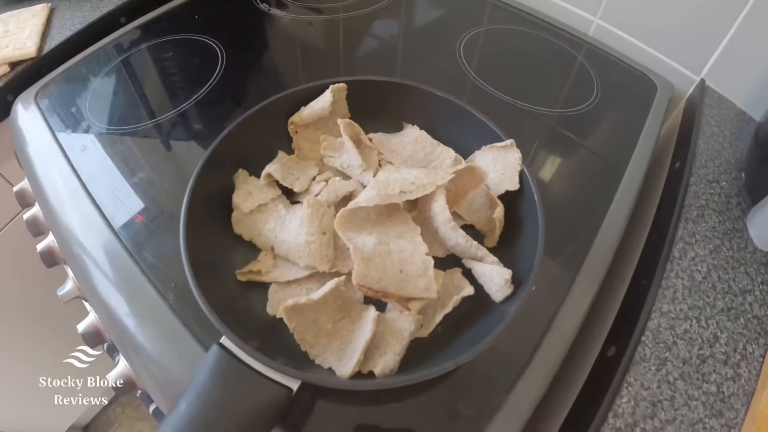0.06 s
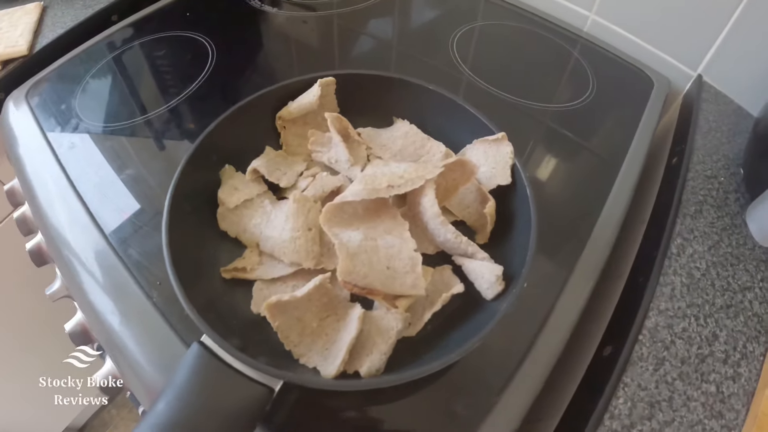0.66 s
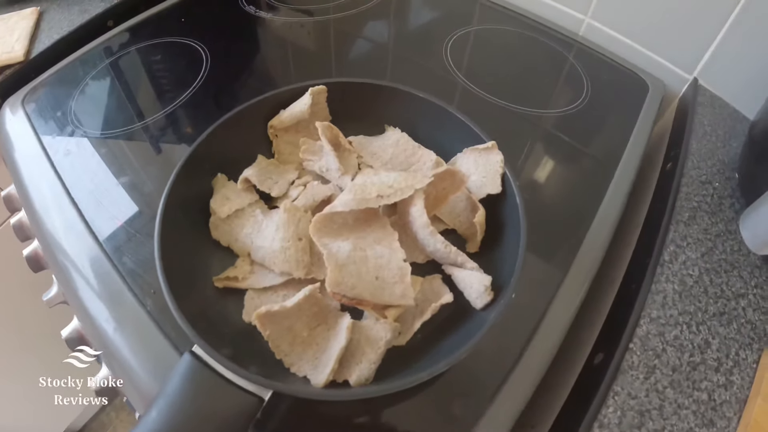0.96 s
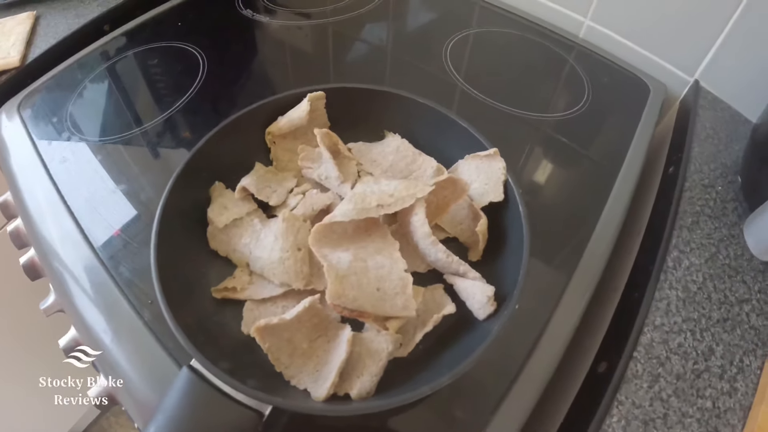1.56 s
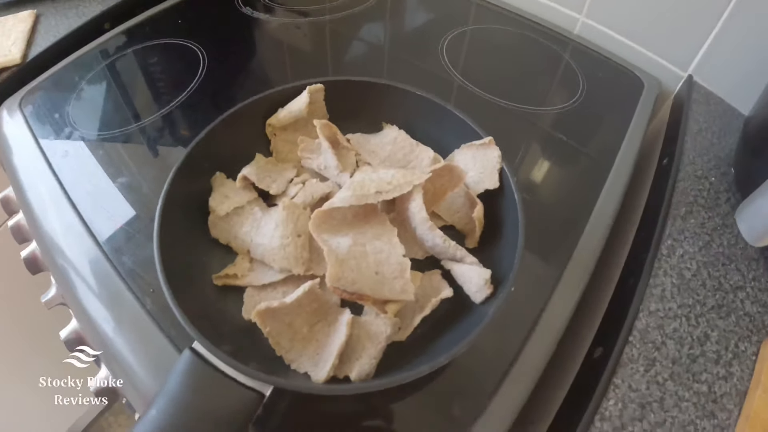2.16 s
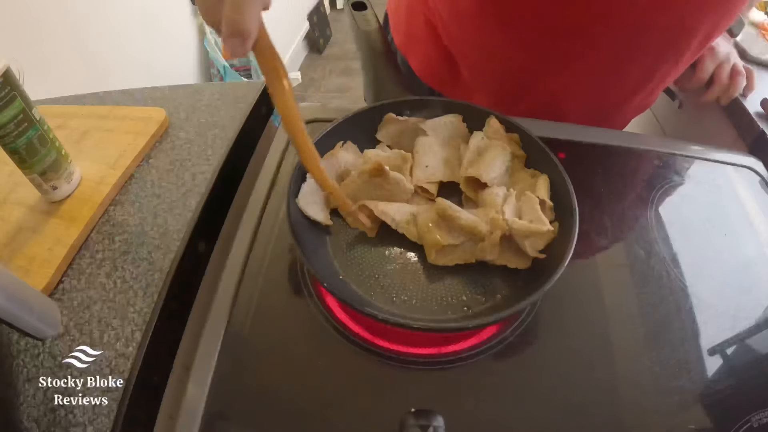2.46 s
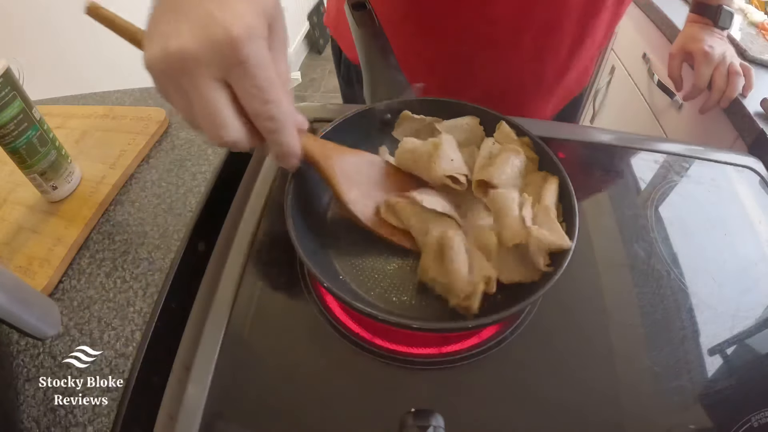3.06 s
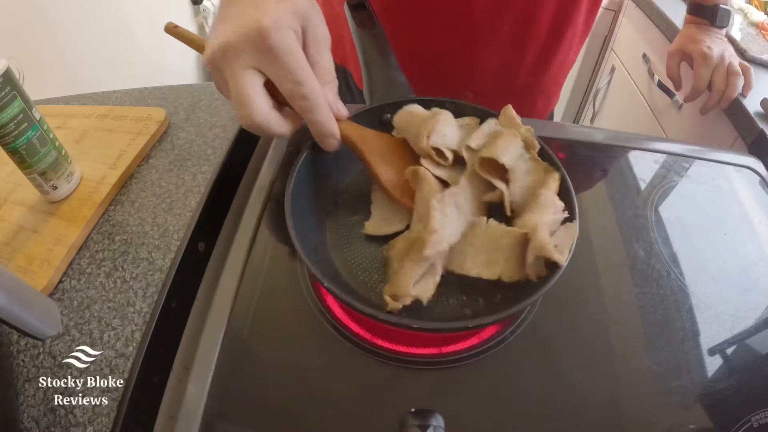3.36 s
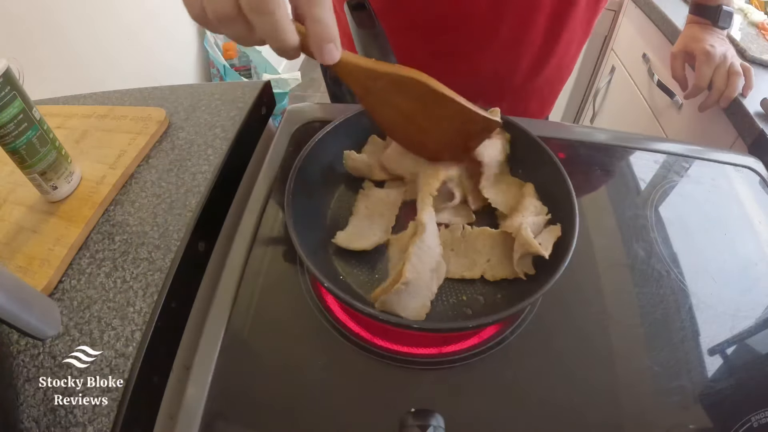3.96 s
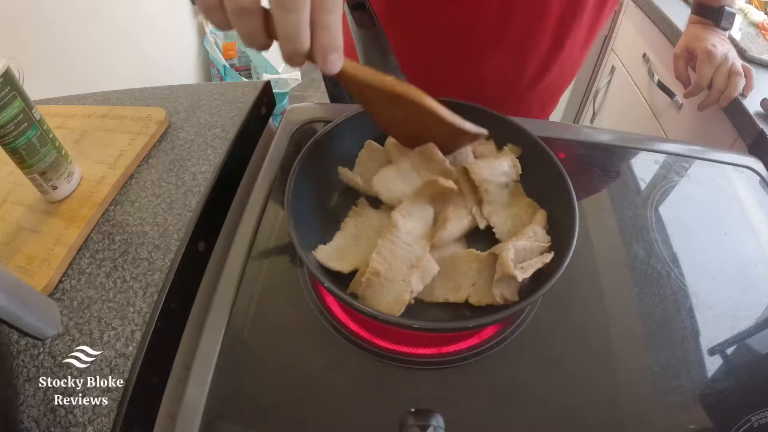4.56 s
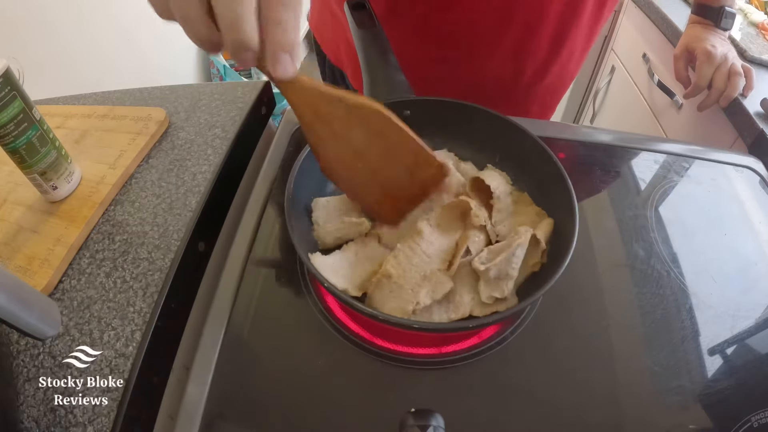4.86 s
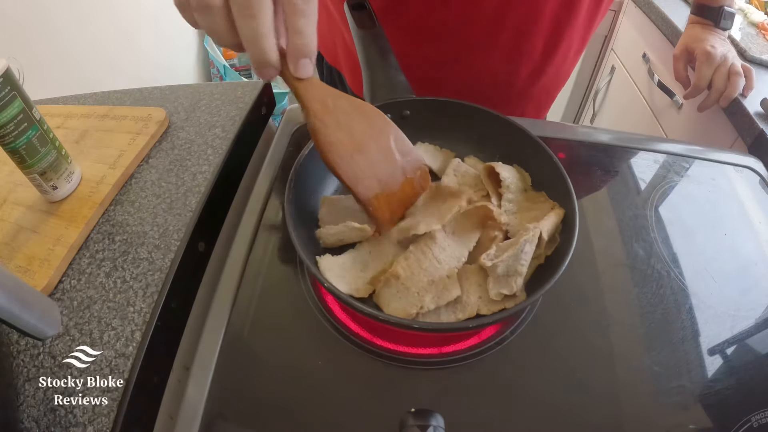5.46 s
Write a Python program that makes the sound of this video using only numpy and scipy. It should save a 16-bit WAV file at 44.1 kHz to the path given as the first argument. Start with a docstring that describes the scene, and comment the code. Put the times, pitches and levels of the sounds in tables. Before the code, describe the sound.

In a small kitchen with a low hum, meat fries with a steady, crackling hiss. At first the microphone hovers over the pan, with dull bumps and clicks from handling. The sound cuts out briefly and resumes, narrower and straight ahead: the pan knocks lightly on a glass hob, faint puffs of steam escape, and the sizzling dips and surges with the stirring, dotted with sharp pops of fat.

```python
"""A close, bright sizzle: steam bubbles burst under slices of meat in a pan on a glass hob.
The camera's stereo microphone is hand-held just over the pan, in a small kitchen with a low drone;
fat spits, and the camera body thumps, sways and clicks under the fingers.
After a short silence the microphone stands across the hob: a wooden spatula turns the meat,
the frying flares, the pan knocks on the glass and steam hisses from under the pressed slices."""
import sys
import numpy as np
from scipy import signal
from scipy.fft import rfft, irfft, next_fast_len
from scipy.io import wavfile
from scipy.ndimage import map_coordinates

SR = 44100
rng = np.random.default_rng(int(sys.argv[2]) if len(sys.argv) > 2 else 0)


def bounce(signal):
    """Save signal as a 16-bit WAV file at the path given by the first command-line argument."""
    frames = np.transpose(np.atleast_2d(signal))
    limited = np.clip(frames, -1, 1)
    pcm = np.round(limited * 32767).astype(np.int16)
    wavfile.write(sys.argv[1], SR, pcm)


N = 251370


def amp(db):
    """Decibels to gain."""
    return 10 ** (np.asarray(db) / 20)


def unit(x):
    """Scale to rms 1."""
    return x / np.sqrt(np.mean(x ** 2) + 1e-20)


def along(points, hz):
    """Interpolate (f/Hz, value) points on a log-frequency axis."""
    freqs, values = np.transpose(points)
    return np.interp(np.log(hz + 1), np.log(freqs + 1), values)


def clock():
    """The time of every sample."""
    return np.arange(N) / SR


def curve(points):
    """Interpolate (t/s, value) points at every sample."""
    return np.interp(clock(), *np.transpose(points))


def hump(s, length):
    """A smooth swell of height 1 centred on time s."""
    return np.exp(-((clock() - s) / length) ** 2)


def wobble(rate):
    """A smooth random curve, rate knots a second."""
    return map_coordinates(rng.standard_normal(int(N * rate / SR) + 4), [clock() * rate])


def filtered(x, response):
    """Shape x by a response, a function of frequency."""
    n = x.shape[-1]
    padded = next_fast_len(n + 8192)
    return irfft(rfft(x, padded) * response(np.fft.rfftfreq(padded, 1 / SR)), padded)[..., :n]


def bell(hz, centre_hz, octaves):
    """A hump of height 1 on a log-frequency axis."""
    return np.exp(-.5 * (np.log2((hz + 1) / centre_hz) / octaves) ** 2)


def add(track, s, sound):
    """Mix a sound into a track at time s."""
    part = track[..., round(s * SR):][..., :sound.shape[-1]]
    part += sound[..., :part.shape[-1]]


def stereo(pair, colour, width):
    """Colour two unrelated signals as mid (rms 1) and side; width lists f/Hz, side minus mid/dB."""
    mid, side = filtered(pair, lambda hz: colour(hz) * amp([np.zeros_like(hz), along(width, hz)]))
    return np.array([mid + side, mid - side]) / np.std(mid)


def leaning(x, balance):
    """Tilt a sound to one side; balance lists f/Hz, left minus right/dB."""
    return filtered(x, lambda hz: amp(along(balance, hz) * np.array([[.5], [-.5]])))


def bursts(rate, spread_db, life_s, hiss_db, biggest=3.1):
    """Tiny steam bubbles burst at random, each a short puff; the countless smallest merge into hiss."""
    sizes = amp(spread_db * np.minimum(rng.standard_exponential(N), biggest))
    onsets = (rng.random(N) < rate / SR) * sizes ** 2
    power = signal.lfilter([1], [1, -np.exp(-2 / (life_s * SR))], onsets)
    return unit(np.sqrt(power / power.mean() + amp(hiss_db) ** 2) * rng.standard_normal((2, N)))


# Broad resonances of the open pan: f/Hz, width/octaves, gain/dB
PAN_RESONANCES = [(687, 0.27, -2), (1100, 0.13, 1), (1343, 0.11, 2), (1612, 0.13, 7.5), (1970, 0.1, 1),
                  (2930, .08, 2.5), (3680, 0.11, 3)]

def bowl(hz):
    """The open pan colours all that pops inside it."""
    return amp(sum(db * bell(hz, centre_hz, octaves) for centre_hz, octaves, db in PAN_RESONANCES))


# Juice boiling under the meat: f/Hz, relative level/dB
JUICE_SPECTRUM = [(250, -33), (500, -16), (760, -7), (1050, 3.5), (1600, -4), (2100, -0.5), (3000, -14)]

def frying(levels, spectrum, width, pops, spray_trim_db, usual_db=-48, split_hz=8300, flutter_db=0.88):
    """Bubbles burst as sizzle and fine spray, juice boils lower down; one strength drives all three."""
    strength_db, flare_db = curve(levels) - usual_db, flares()
    sizzle_db = usual_db + strength_db + flare_db
    spray_db = -60 + spray_trim_db + 0.37 * strength_db + 0.88 * flare_db
    juice_db = -59 + 1.63 * strength_db + 1.8 * flare_db + 1.2 * wobble(8)
    low_share = lambda hz: 1 / (1 + (hz / split_hz) ** 20)
    colour = lambda hz: bowl(hz) * amp(along(spectrum, hz)) * hz ** 3 / (hz ** 3 + 1100 ** 3)
    sizzle = stereo(pops, lambda hz: colour(hz) * low_share(hz), width)
    spray = stereo(pops, lambda hz: colour(hz) * (1 - low_share(hz)), width)
    boiling = bursts(rate=380, spread_db=2.0, life_s=.0012, hiss_db=-1)
    juice = stereo(boiling, lambda hz: bowl(hz) * amp(along(JUICE_SPECTRUM, hz)), width)
    fry = amp(sizzle_db) * sizzle + amp(spray_db) * spray + amp(juice_db) * juice
    return fry * amp(flutter_db * wobble(35))


def small_bubble(hz, low_hz, high_hz):
    """Small bubbles radiate no bass, and the fat damps their highest treble."""
    return hz ** 3 / (hz ** 3 + low_hz ** 3) / np.sqrt(1 + (hz / high_hz) ** 6)


def crackles(levels, rate, pitch_hz, db, spread_db=5.5, cycles=3.0):
    """Larger bubbles snap one by one, each at its own pitch, louder when the sizzle is strong."""
    when, pitch_draw, size_draw = rng.random((round(rate * N / SR), 3)).T
    starts = (when * (N - 1)).astype(int)
    snap_hz = pitch_hz * 2 ** (1.3 * pitch_draw[:, None] ** 1.5 - .4)
    size = amp(curve(levels)[starts] + db - spread_db * np.log(1 - .93 * size_draw))
    step = np.arange(SR // 200)
    turns = snap_hz * step / SR
    snaps = size[:, None] * np.sin(2 * np.pi * turns) * np.exp(-turns / cycles)
    track = np.bincount((starts[:, None] + step).ravel(), snaps.ravel(), N)[:N]
    return filtered(track, lambda hz: small_bubble(hz, 1500, 8000))


def drone(spectrum, width):
    """Room tone: the steady low noise of the kitchen."""
    return stereo(rng.standard_normal((2, N)), lambda hz: amp(along(spectrum, hz)), width)


# Soft bumps on the camera body, right at the microphone: t/s, level/dB, t60/s
BODY_BUMPS = [(0.295, -29.5, 0.21), (0.706, -19, 0.21), (1.064, -23.5, 0.2), (1.15, -21, 0.24),
              (1.356, -36, 0.47), (1.398, -27.5, 0.44)]

def bumps(ring_hz=92, push_hz=42, push_db=-3, push_t60=0.11, attack_s=0.0091):
    """A soft bump shoves the camera, which shudders on its mount."""
    track, t = np.zeros(N), np.arange(SR // 2) / SR
    for s, db, t60 in BODY_BUMPS:
        shudder = -np.sin(2 * np.pi * ring_hz * t) * amp(-60 * t / t60)
        shove = np.sin(2 * np.pi * push_hz * t) * amp(push_db - 60 * t / push_t60)
        add(track, s, amp(db) * (shudder + shove) * (1 - np.exp(-(t / attack_s) ** 2)))
    return track


# The loudest spits of fat, at both microphone positions: t/s, relative level/dB, f/Hz
FAT_SPITS = [(0.9608, -29, 7000), (1.7290, -26, 5340), (2.1531, -22.5, 7000), (2.307, -24.5, 5400),
             (2.5378, -27, 4300), (2.5576, -26, 5350), (2.6073, -23.5, 5040), (2.7447, -31, 2970),
             (3.1416, -32, 3680), (3.1649, -23.5, 4780), (3.8915, -32, 4630), (3.979, -27, 3970),
             (4.0697, -11, 3210), (4.0802, -23.5, 3600), (4.3103, -20.5, 2640), (4.347, -27.5, 3620),
             (4.4988, -22, 3430), (4.505, -21.5, 3400), (4.6595, -29, 3300), (4.8373, -24, 3380),
             (5.325, -27, 3330)]

def spits(ring_cycles=1.58, crack_s=0.0021, splash_s=0.011, tick_hz=950, tick_s=0.0014, room_db=-7):
    """A drop of water explodes in the fat: a crack, a short ring and a dull tick of the pan."""
    track, t = np.zeros(N), np.arange(SR // 16) / SR
    loudest_db = max(db for _, db, _ in FAT_SPITS)
    puff_decay = amp(-11) * np.exp(-t / crack_s) + amp(-23) * np.exp(-t / splash_s)
    tick = np.sin(2 * np.pi * tick_hz * t) * np.exp(-t / tick_s)
    for s, db, pitch_hz in FAT_SPITS:
        ring = np.sin(2 * np.pi * pitch_hz * t) * np.exp(-pitch_hz * t / ring_cycles)
        puff = rng.standard_normal(len(t)) * puff_decay
        band = lambda hz: 1 / np.sqrt(1 + (hz / pitch_hz - pitch_hz / (hz + 1)) ** 2)
        # small, high spits barely move the pan
        tick_gain = amp(-11 + .35 * (db - loudest_db)) * min(3000 / pitch_hz, 1) ** 3
        add(track, s, amp(db) * (filtered(1.21 * ring + 1.26 * puff, band) + tick_gain * tick))
    track = filtered(track, lambda hz: bowl(hz) * small_bubble(hz, 560, 14000))
    return track + amp(room_db) * kitchen(track)


# Reverberation of the small kitchen around the hob: f/Hz, t60/s
KITCHEN_DECAY = [(150, 0.51), (1000, 0.48), (4000, 0.12), (12000, 0.22)]

def kitchen(x):
    """Diffuse answer of the room: each frequency dies at its own speed."""
    hz, t, noise = signal.stft(rng.standard_normal(SR // 2), SR, nperseg=256)
    decay = amp(-60 * t / along(KITCHEN_DECAY, hz)[:, None])
    _, tail = signal.istft(noise * decay, SR, nperseg=256)
    tail = np.pad(tail, (SR // 300, 0))
    return signal.fftconvolve(x, tail / np.linalg.norm(tail))[:N]


# Fingers on the case: t/s, relative click level/dB, relative thud level/dB, thud f/Hz, click cutoff/Hz
FINGER_TAPS = [(1.9003, -21.5, -31.5, 90, 2060), (2.0008, -12, -27.5, 70, 4360),
               (2.2506, -13.5, -23, 75, 11100), (2.2861, -51, -14.5, 50, 1025)]
# Modes of the plastic case around the microphone: f/Hz, level/dB, t60/s
CASE_MODES = [(189, -1, 0.026), (498, -9, 0.01), (950, 0, 0.0059), (1340, -1.5, 0.017), (1700, -4, 0.0093),
              (2580, -0.5, .014), (3210, -3, 0.011), (5400, -20.5, .008), (7780, -10, 0.013),
              (12000, -6.5, 0.0071)]

def fingers(thud_t60=0.064, thud_attack_s=0.0012, click_attack_s=0.00025):
    """Fingers click and thud on the plastic case; the two ports hear each mode at different phases."""
    track, t = np.zeros((2, N)), np.arange(SR // 5) / SR
    port_phase = lambda hz: 0.48 * min(hz / 2000, 1) * np.array([[1], [-1]])
    ring = sum((-1) ** k * amp(level - 60 * t / t60) * np.sin(2 * np.pi * hz * t + port_phase(hz))
               for k, (hz, level, t60) in enumerate(CASE_MODES))
    for s, click_db, thud_db, thud_hz, dull_hz in FINGER_TAPS:
        grit = amp(-5 - 60 * t / .009) * rng.standard_normal((2, len(t)))
        click = (ring + grit) * (1 - np.exp(-t / click_attack_s))
        click = filtered(click, lambda hz: 1 / np.sqrt(1 + (hz / dull_hz) ** 4))
        thud = -np.sin(2 * np.pi * thud_hz * t + 1) * amp(-60 * t / thud_t60)
        thud *= 1 - np.exp(-(t / thud_attack_s) ** 2)
        add(track, s, amp(click_db - 5.0) * click + amp(thud_db + 3.5) * thud)
    return track


def handling(sway_start_s=1.3, onset_s=0.031, sway_db=-32, lurch_s=1.933, lurch_db=9):
    """The hand sways the camera, most as the grip changes; fingers tap beside the right port."""
    taps = fingers()
    spectrum = [(5, -7), (13, 5.5), (32, -1), (50, -11.5), (90, -28), (300, -58), (900, -100)]
    sway = unit(filtered(rng.standard_normal(N), lambda hz: amp(along(spectrum, hz))))
    sway *= amp(sway_db + lurch_db * hump(lurch_s, 0.15))
    sway *= np.clip((clock() - sway_start_s) / onset_s, 0, 1)
    return leaning(taps + sway, [(60, -4.5), (1300, -15), (2600, -4), (6000, 14.5)])


# Untouched meat, microphone just over the pan: t/s, level/dB
CLOSE_FRY_LEVELS = [(0, -48), (1.2, -47.5), (2.33, -46)]
# Sizzle and room tone at this spot: f/Hz, relative level/dB
CLOSE_SIZZLE = [(1500, -11.5), (1900, -7), (2400, 1.5), (3000, -3), (3550, -0.5), (4500, -5), (5500, -3),
                (7000, -5.5), (8400, -9.5), (10000, -12.5), (12000, -15.5), (13500, -31.5), (15500, -40)]
CLOSE_DRONE = [(12, -51), (20, 4), (56, -7.5), (71, -12.5), (125, -24.5), (189, -24.5), (223, -29),
               (295, -26.5), (318, -34), (435, -37), (700, -48.5), (910, -94.5), (1540, -120)]
# Stereo width of the frying: f/Hz, side minus mid/dB
CLOSE_WIDTH = [(300, -1), (1400, -3.5), (2400, -6), (4400, -4.5), (8000, -1), (14000, -50)]
# Balance at the microphone: f/Hz, left minus right/dB
CLOSE_BALANCE = [(300, -2), (1300, .5), (2400, 2.5), (4400, 4), (8100, 6), (15000, 2.5)]
# The bubbles get finer as the pan heats up: t/s, treble tilt/dB
HEAT_TILT = [(0, -4), (.8, -3.5), (1.3, 0), (2.3, 0.5)]

def over_the_pan(events):
    """Close and hand-held: the fat lies to the left and reaches the two ports a moment apart."""
    heat_db = curve(HEAT_TILT)
    pops = bursts(rate=930, spread_db=8.0, life_s=0.00043, hiss_db=5)
    fry = frying(CLOSE_FRY_LEVELS, CLOSE_SIZZLE, CLOSE_WIDTH, pops, spray_trim_db=0.39 * heat_db - 1.5)
    fry += crackles(CLOSE_FRY_LEVELS, rate=72, pitch_hz=3360, db=-3)
    treble = filtered(fry, lambda hz: hz ** 4 / (hz ** 4 + 3000 ** 4))
    tilt = amp(heat_db / 2)
    room_tone = amp(-46) * drone(CLOSE_DRONE, width=[(100, -10), (300, -3.5)])
    sound = treble * tilt + (fry - treble) / tilt + events + room_tone
    port_shift = lambda hz: np.exp(.5j * np.tanh(hz / 2500) * np.array([[-1], [1]]))
    return leaning(filtered(sound, port_shift), CLOSE_BALANCE) + handling()


# Pushes of the spatula, heard across the hob: t/s, length/s, rise/dB
SPATULA_PUSHES = [(2.516, 0.14, 4.5), (3.122, 0.058, 4), (4.06, 0.044, 2.5), (4.295, 0.02, 6),
                  (5.556, 0.064, 2)]

def flares(attack_s=.02, release_s=0.019):
    """Extra frying in dB: it rises as wet meat meets hot metal, holds while it slides and dies away."""
    t = clock()
    return sum(db * np.clip((t - s) / attack_s, 0, 1) * np.exp(-np.maximum(t - s - length, 0) / release_s)
               for s, length, db in SPATULA_PUSHES)


# Knocks on the hob: t/s, level/dB, favoured f/Hz, boost there/dB, treble slope/(dB per octave)
PAN_KNOCKS = [(2.6844, -32.5, 1386, 19, 1), (2.8124, -29, 866, 12.5, 0.6), (3.310, -38, 229, 9.5, -0.5)]
# Modes of the pan on the glass: f/Hz, level/dB, t60/s
PAN_MODES = [(168.3, -2, 0.2), (214.6, 2, 0.13), (282.5, 6, 0.072), (386.4, -13, 0.28), (477, -1.5, 0.069),
             (508, -9, 0.14), (604, -12, .07), (827, -24, 0.045), (972, -2, 0.057), (1157, -6, 0.066),
             (1562, -9.5, 0.084), (1629, -4.5, 0.051), (2220, -20, 0.063), (2790, -10, 0.075),
             (3130, -9.5, 0.063), (4988, -17, .04)]

def knocks(attack_s=0.0018, scuff_db=0.5, scuff_t60=0.063, scuff_hz=1000, room_db=-7):
    """The spatula tips the pan on to the glass; the place of contact picks the modes that ring most."""
    track, t = np.zeros(N), np.arange(SR // 2) / SR
    for s, db, strong_hz, boost_db, slope_db in PAN_KNOCKS:
        tilt = lambda hz: amp(slope_db * np.log2(np.maximum(hz / 220, 1)))
        contact = lambda hz: tilt(hz) * amp(boost_db * bell(hz, strong_hz, 1 / 5))
        ring = sum(contact(hz) * amp(level - 60 * t / t60) * np.sin(2 * np.pi * (hz * t + rng.random()))
                   for hz, level, t60 in PAN_MODES)
        scuff = unit(filtered(rng.standard_normal(len(t)), lambda hz: tilt(hz) * bell(hz, scuff_hz, 1.12)))
        scuff *= amp(scuff_db - 60 * t / scuff_t60)
        add(track, s, amp(db) * (1 - np.exp(-t / attack_s)) * (ring + scuff))
    return track + amp(room_db) * kitchen(track)


# Wet meat pressed on hot metal, heard across the hob: t/s, half-length/s, level/dB, f/Hz
STEAM_JETS = [(3.036, 0.042, -55, 5760), (3.212, 0.036, -51, 5100), (3.27, 0.036, -54, 4800),
              (4.706, 0.026, -55, 6000)]

def squeezes(octaves=0.14):
    """Steam escapes from under a pressed slice with a narrow hiss."""
    return sum(noise_swell(*jet, octaves) for jet in STEAM_JETS)


def noise_swell(s, length, db, centre_hz, octaves):
    """A band of noise swells and fades around time s."""
    band = unit(filtered(rng.standard_normal(N), lambda hz: bell(hz, centre_hz, octaves)))
    return amp(db) * band * hump(s, length)


# A faint low rumble at the standing microphone: t/s, half-length/s, level/dB, f/Hz
LOW_RUMBLE = (5.59, .05, -36, 48)

def rumble():
    """A brief deep swell under the stirring."""
    return noise_swell(*LOW_RUMBLE, octaves=0.34)


# From across the hob, the frying sinks as the meat is lifted and jumps as it drops back: t/s, level/dB
FAR_FRY_LEVELS = [(2.5, -50.3), (2.9, -50), (3.4, -54.5), (3.72, -51), (4.03, -50), (4.12, -47),
                  (4.57, -48.5), (4.88, -45.5), (5.7, -47)]
# Sizzle and room tone at this spot: f/Hz, relative level/dB
FAR_SIZZLE = [(600, -28), (1500, -12), (2000, -3), (2850, 1.5), (3800, 0), (4500, -1.5), (7000, -3),
              (8000, -12), (10500, -11.5), (13000, -11), (15500, -20)]
FAR_DRONE = [(12, -29), (20, 1.5), (51, 2), (62, -1), (75, -4.5), (119, -11), (173, -17.5), (204, -9.5),
             (258, -28), (291, -11.5), (323, -28.5), (468, -43.5), (750, -35), (910, -44), (1540, -120)]
# Stereo width of the frying: f/Hz, side minus mid/dB
FAR_WIDTH = [(600, -8), (1300, -32.5), (2400, -53), (4400, -57), (7000, -44), (8500, -51), (12500, 1.5)]
# Slow swell of the room tone: t/s, level/dB
FAR_DRONE_LEVELS = [(2.5, -50), (3.3, -47), (4.2, -49.5), (5.7, -48)]

def across_the_hob(events):
    """The frying is heard dead ahead, nearly mono; above about 12 kHz the sound spreads wide."""
    pops = bursts(rate=1400, spread_db=8.5, life_s=0.0011, hiss_db=4)
    fry = frying(FAR_FRY_LEVELS, FAR_SIZZLE, FAR_WIDTH, pops, spray_trim_db=-0.5)
    fry = leaning(fry, [(8000, 0), (14000, 2.5)])
    fry += crackles(FAR_FRY_LEVELS, rate=86, pitch_hz=3030, db=4.0)
    sound = fry + events + rumble()
    return sound + amp(curve(FAR_DRONE_LEVELS)) * drone(FAR_DRONE, width=[(100, -37.5), (400, -23)])


def scene(cut_s=2.33, resume_s=2.443, fade_in_s=0.074):
    """One pan from two microphone positions, with a silence between."""
    events = spits() + squeezes() + knocks() + bumps()
    close_gain = np.clip((cut_s - clock()) / 0.0015, 0, 1)
    far_gain = np.clip((clock() - resume_s) / fade_in_s, 0, 1) ** 2
    return close_gain * over_the_pan(events) + far_gain * across_the_hob(events)


def record(dry):
    """The camera keeps nothing above 15.8 kHz."""
    return filtered(dry, lambda hz: hz < 15800)


dry = scene()
out = record(dry)
bounce(out)
```